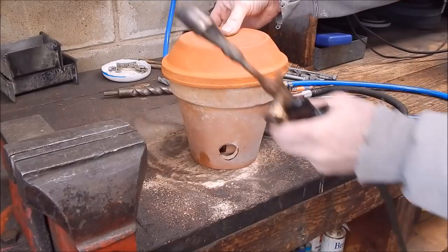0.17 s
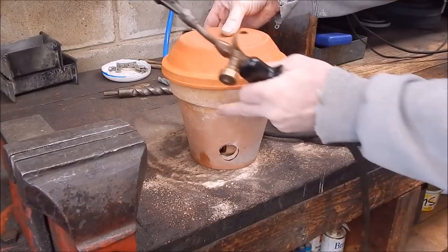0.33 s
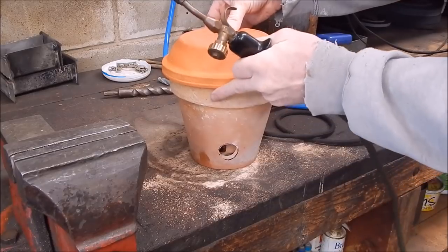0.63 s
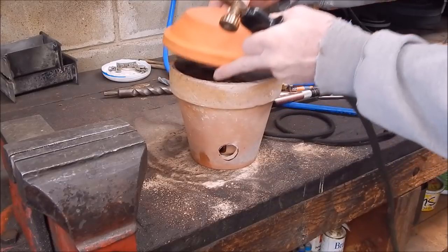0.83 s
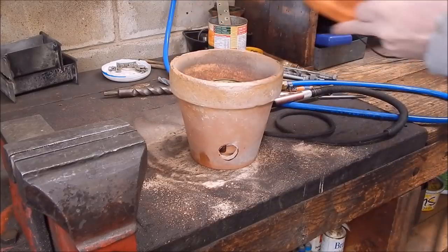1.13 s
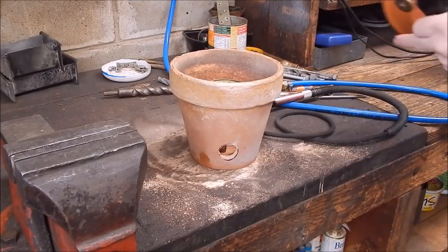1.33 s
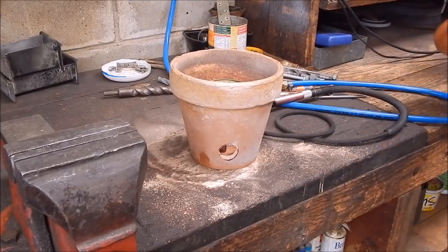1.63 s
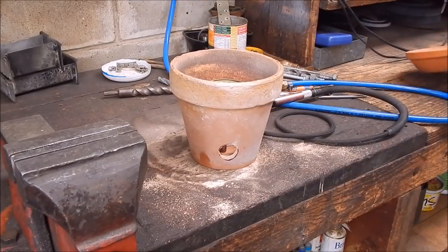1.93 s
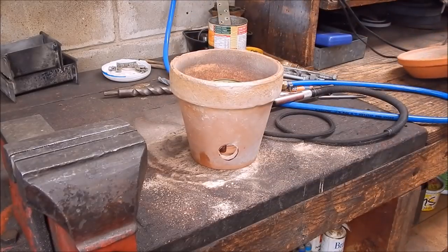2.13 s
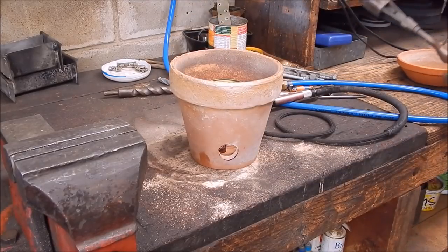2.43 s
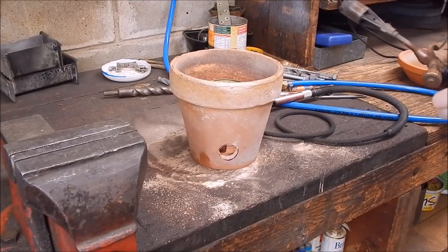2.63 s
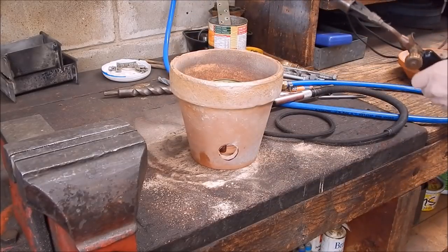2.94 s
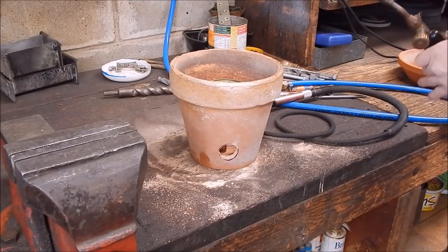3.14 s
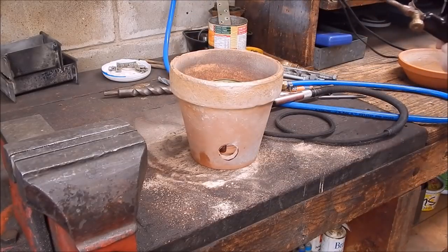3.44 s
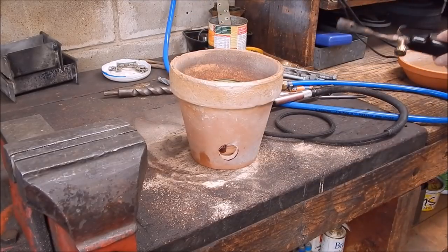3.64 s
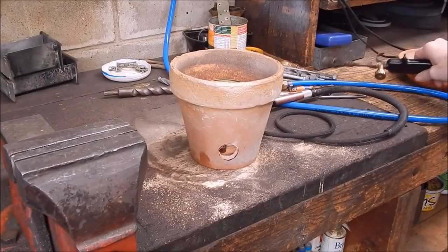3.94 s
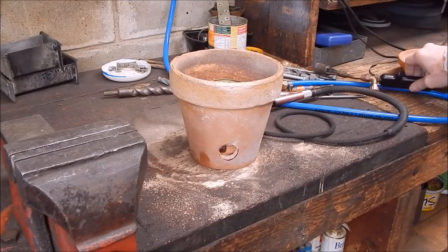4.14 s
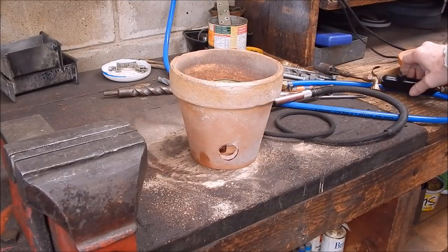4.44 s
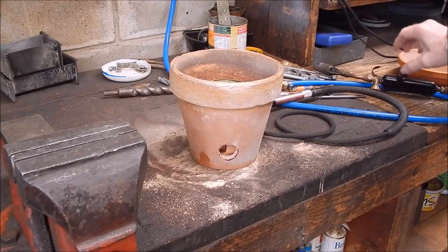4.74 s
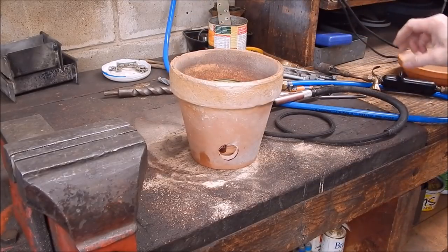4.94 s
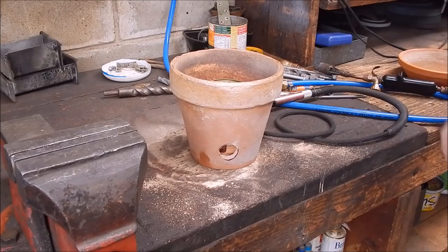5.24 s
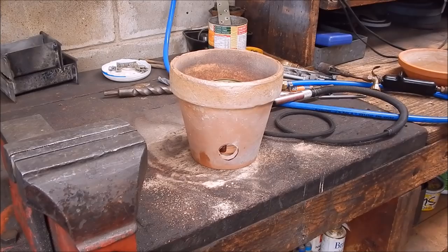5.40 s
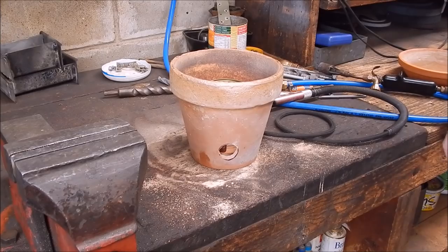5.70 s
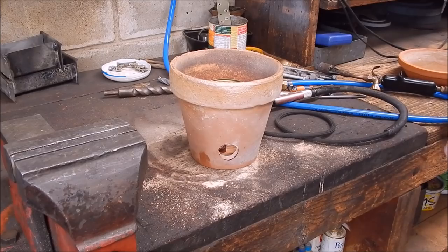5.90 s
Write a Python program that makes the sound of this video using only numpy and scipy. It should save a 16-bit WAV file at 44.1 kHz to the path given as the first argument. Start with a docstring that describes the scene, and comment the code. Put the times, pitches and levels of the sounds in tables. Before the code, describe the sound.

Over steady soft hiss, a clay lid clinks and scrapes off a flower pot, thuds onto a wooden bench, then a metal torch clacks down.

```python
"""A thin brass ring and a small bump come first, over a steady hiss that lasts throughout.
A clay saucer, the lid of a flower pot, is nudged off with a brass gas torch; the pot rocks and a sleeve swishes.
The saucer is set down on a wooden workbench, then the torch is laid down with a clack and a thud.
Struck objects are fading sine tones and short noise bursts; hiss and cloth are coloured noise.
The small workshop answers each knock with dense echoes, and a faint low drone rises in pitch."""
import sys
import numpy as np
from scipy import signal
from scipy.io import wavfile
from scipy.ndimage import uniform_filter1d

SR = 44100
rng = np.random.default_rng(int(sys.argv[2]) if len(sys.argv) > 2 else 0)


def master(y):
    """Save y as 16-bit WAV."""
    cut = np.clip(np.atleast_2d(y).T, -1, 1)
    pcm = np.round(cut * 32767)  # scale
    wavfile.write(sys.argv[1], SR, pcm.astype(np.int16))


N = 267510

# Knocks on the bench, first the saucer, then the torch:
# (time [s], thud of the top [dB], clack of the contact [dB], gritty tick [dB], slide [s])
BENCH_KNOCKS = [(2.278, -23, -35, -82, 0.00031), (2.2836, -16.5, -39.5, -74, 0.00061),
                (2.3246, -21, -38, -86, 0.0019), (2.344, -26, -56, -79, 0.0018),
                (2.549, -38, -39, -47.5, 0.0051), (2.567, -25.5, -48, -60, 0.0026),
                (2.579, -39, -48, -66, 0.0022), (2.663, -29.5, -48, -56, 0.0071),
                (2.712, -38, -57, -63, .005), (3.556, -48, -55, -64, 0.02),
                (4.0724, -43, -30.5, -31.5, 0.000081), (4.0736, -40, -21.5, -44, 0.00032),
                (4.078, -39.5, -30.5, -36, 0.00037), (4.087, -40, -34, -58, 0.00027),
                (4.1022, -34.5, -48, -58, .0005), (4.115, -32.5, -35.5, -46, 0.0011),
                (4.232, -27.5, -31.5, -43, 0.0044), (4.250, -31, -31, -45.5, 0.00077)]
# The lid touches the pot:
# (time [s], thump through the base [dB], hollow ring of the pot [dB], clink of the lid [dB], gritty tick [dB])
LID_CONTACTS = [(0.4226, -46.5, -55, -31.5, -66), (.749, -54, -36.5, -43, -51.5),
                (.771, -33, -31, -46, -67), (.797, -34.5, -37.5, -48, -70), (.858, -40.5, -41, -74, -64),
                (.885, -41, -42.5, -68, -55), (.903, -36, -62, -70, -70)]
# Short bumps and ticks of wood, clay and brass with one main note: (time [s], level [dB], frequency [Hz])
SMALL_BUMPS = [(.012, -35, 390), (.467, -39, 3880), (.568, -36, 305), (.712, -27, 317), (.752, -38, 313),
               (.862, -33.5, 410), (2.553, -39, 1470), (2.561, -29, 95.7), (2.664, -26.5, 713),
               (2.671, -29, 377), (2.716, -42, 730), (3.558, -33.5, 373), (4.0718, -14, 6900),
               (4.074, -17, 725), (4.236, -16.5, 171.5), (4.251, -22.5, 112.4), (4.51, -47, 620)]
# The brass nozzle is set ringing: (time [s], level [dB], free ringing [s])
NOZZLE_PINGS = [(0., -46, .38), (4.078, -45, 0.065), (4.25, -55, 0.031), (4.324, -55, 0.038)]
# The saucer, then the torch, meets the bench and rings: (time [s], level [dB])
SAUCER_LANDINGS = [(2.2838, -33.5), (2.3245, -41)]
TORCH_LANDINGS = [(4.0735, -23), (4.1025, -29.5), (4.25, -34.5)]
# The sleeve strokes as the arm reaches and draws back: (start [s], length [s], level [dB])
SLEEVE_STROKES = [(-.03, 0.06, -52.5), (0.067, 0.35, -67), (.72, 0.17, -64.5), (1.015, 0.21, -54),
                  (1.293, 0.39, -63.5), (2.374, .22, -58.5), (3.144, 0.23, -67.5), (3.557, 0.35, -67.5)]

# Clear notes (modes) of each object: (frequency [Hz], level [dB], time to fall 60 dB [s])
BENCH_MODES = [(113, -9, .55), (160, -9, .25), (178, 1.5, .34), (195, -2, .22), (262.5, -1, .32),
               (327.5, -7, .25), (369, -8.5, .24), (440, -3, .22)]
POT_MODES = [(350.3, -4, 0.14), (420, -20, .09), (654.7, 0, 0.15), (680.5, -4, 0.16), (770, -12, 0.13),
             (835, -9.5, 0.19)]
LID_MODES = [(509, -1.5, 0.11), (587, 3, 0.081), (1009, 8, 0.046), (1130, -10, 0.1), (2980, -27, .12)]
NOZZLE_MODES = [(2330, -6, .25), (2810, -8.5, 0.35), (5340, -0.5, 0.76), (5380, -1, 0.84),
                (5565, 0.5, 0.22)]
VALVE_MODES = [(8500, -7, 0.19), (8730, 3, 0.11), (9870, -4, 0.16)]
SAUCER_MODES = [(710, -1, 0.081), (890, -6.5, 0.081), (1420, -7.5, 0.11), (1633, -1.5, 0.085),
                (2006, -2.5, 0.11)]
TORCH_MODES = [(628, -1, 0.15), (725, 0, 0.13), (1030, -3, 0.16), (1234, 1.5, 0.13), (1510, -5, 0.098),
               (1780, -6, 0.089), (2180, -6, 0.1)]

# Colours of the dense, quickly fading blows: (frequency [Hz], level per Hz [dB])
THUD_COLOUR = [(31, -22), (71, -21.5), (111, -2), (201, 4), (431, -7), (561, -9.5), (901, -31), (2001, -36),
               (5001, -82)]
CLACK_COLOUR = [(61, -19.5), (301, -12.5), (651, -1), (951, -4.5), (1301, -6.5), (1901, -11.5),
                (2501, -18.5), (3501, -24.5), (6001, -53.5), (12001, -86)]
TICK_COLOUR = [(300, -28), (2000, 10.5), (4000, -3), (6000, -1.5), (9000, 1), (12000, 1.5)]
THUMP_COLOUR = [(26, -24), (61, -3), (121, 0), (181, -12.5), (261, -18), (701, -29), (3001, -70)]
ROLL_COLOUR = [(200, -23.5), (480, -6), (660, 0.5), (800, -15.5), (1500, -18), (5000, -63)]
CLINK_COLOUR = [(100, -16), (330, -4), (550, -6), (750, -8), (1020, -2), (1350, -10.5), (2000, -18.5),
                (2600, -33), (3800, -26.5), (6000, -42)]
# Colours of the steady hiss and of the rubbing cloth: (frequency [Hz], level per Hz [dB])
HISS_COLOUR = [(12, -56.5), (20, -11.5), (32, -1), (48, 2), (170, 2), (291, -3.5), (434, -6), (483, -9),
               (583, -8), (783, -10.5), (1020, -11.5), (1110, -10), (1270, -11.5), (2750, -23.5),
               (12000, -35.5), (15600, -75), (22000, -120)]
CLOTH_COLOUR = [(1000, -23), (2400, 1.5), (3000, 5), (3700, -1), (4600, 1.5), (5600, -2.5), (7700, -5),
                (10800, 1.5), (12000, -2.5)]

# How long the room echoes: (frequency [Hz], time to fall 60 dB [s])
ROOM_DECAY = [(101, 0.55), (401, 0.52), (1201, 0.51), (4001, 0.55), (11001, 0.51)]
# Stereo width of the handling sounds, then of hiss and cloth: (frequency [Hz], side level [dB])
HANDLING_WIDTH = [(61, -29), (201, -22), (501, -16.5), (1001, -9.5), (2001, -4.5), (5001, 0.5), (9001, 0),
                  (12001, -1.5)]
BACKGROUND_WIDTH = [(60, -7.5), (150, -9.5), (350, -6), (600, -3), (1000, -1.5), (1300, -4), (2000, -.5),
                    (5000, -0.5), (12000, 0)]

HISS_DB = -54.5
TOP_EDGE_HZ = 12150
STROKE_ATTACK_S = 0.048
STROKE_RELEASE_SHARE = 0.44  # share of the stroke length: quick moves stop quickly
RUSTLE_DB, RUSTLE_FADE_DB_PER_S = -66.5, 0.7  # cloth keeps stirring, ever less as the arm withdraws
ROCK_START_S, ROCK_PERIOD_S, ROLL_RISE_S = 1.013, 0.149, 0.02
DRONE_PEAK_S, DRONE_DB, DRONE_SLOPE_DB_PER_S = 4.15, -47.5, 20
DRONE_HZ, DRONE_GLIDE_HZ_PER_S = 63, 9.6  # the pitch at the peak, and its steady rise
BLOW_T = np.arange(SR) / SR  # one second of time, in which each blow is built


def amp(db):
    """Turns decibels into a gain."""
    return 10 ** (np.asarray(db) / 20)


def read(points, hz):
    """Reads a table joined by straight lines over log frequency."""
    table_hz, value = np.transpose(points)
    return np.interp(np.log(hz + 1), np.log(table_hz + 1), value)


def add(mix, time_s, sound):
    """Lays a sound into the mix at the given time, cut off at the end of the mix."""
    start = max(0, round(time_s * SR))
    part = mix[:, start:][:, :sound.shape[1]]
    part += sound[:, :part.shape[1]]


def colour(x, points):
    """Filters a sound to the given colour, with no response before its cause."""
    size = 8192
    hz = abs(np.fft.fftfreq(size, 1 / SR))
    log_gain = np.log(amp(read(points, hz)))
    # the Hilbert transform finds the phase that keeps the filter causal
    spectrum = np.exp(np.conj(signal.hilbert(log_gain)))
    taps = np.fft.ifft(spectrum).real[:size // 2]
    return signal.fftconvolve(x, taps[None], axes=1)[:, :x.shape[1]]


def unit_blow(x):
    """Scales a blow to the energy of a hundredth of a second at full level."""
    energy = np.sum(x[0] ** 2)
    return x * np.sqrt(SR / 100 / energy)


def burst(spectrum, t60, rise_s=1e-5):
    """Many close modes that die together, as mid and side; a sliding contact starts them gradually."""
    fade = amp(-60 * BLOW_T / t60)
    rise = 1 - np.exp(-BLOW_T / rise_s)
    grains = rng.standard_normal((2, SR)) * (fade * rise)
    return unit_blow(colour(grains, spectrum))


def ring(modes, side=0.26):
    """A few clear modes fade after one blow, as mid and side, with a peak near one."""
    hz, db, t60 = np.transpose(modes)[:, :, None]
    partials = amp(db - 60 * BLOW_T / t60) * np.sin(2 * np.pi * hz * BLOW_T)
    sign = (-1.) ** np.arange(len(modes))  # neighbouring modes swing in opposite directions
    lean = side * rng.choice([-1, 1], len(modes))
    return np.array([sign @ partials, lean @ partials]) / np.linalg.norm(amp(db))


def noise(spectrum):
    """Steady coloured noise as mid and side, with a mid rms of one."""
    x = colour(rng.standard_normal((2, N + SR)), spectrum)
    x = x[:, SR:]  # drop the start-up of the filter
    return x / x[0].std()


def stereo(x, width, lean=0.075):
    """Turns mid and side into left and right: the width varies with pitch and the sound leans right."""
    leaning_side = x[1:] - lean * x[:1]
    side = colour(leaning_side, width)[0]
    return np.array([x[0] + side, x[0] - side])


def workshop(x, wet_db, build_s=0.01):
    """Adds the room: dense echoes that build up, each band dying at its own speed."""
    hz, t, bands = signal.stft(rng.standard_normal((2, SR)), SR, nperseg=256)
    decay = amp(-60 * t / read(ROOM_DECAY, hz)[:, None])
    tail = signal.istft(bands * decay, SR, nperseg=256)[1][:, :SR]
    tail = tail * (1 - np.exp(-(BLOW_T / build_s) ** 2))
    tail = tail / np.linalg.norm(tail[0])
    echoes = signal.fftconvolve(x[:1], tail, axes=1)[:, :N]
    return x + amp(wet_db) * echoes


def drone():
    """One faint low tone swells and fades once while its pitch rises steadily."""
    t = np.arange(N) / SR - DRONE_PEAK_S
    hz = DRONE_HZ + DRONE_GLIDE_HZ_PER_S * t
    phase = 2 * np.pi * np.cumsum(hz) / SR
    level = amp(DRONE_DB - DRONE_SLOPE_DB_PER_S * abs(t))
    return np.sqrt(2) * level * np.sin(phase)  # root two makes the level an rms


def hiss():
    """Steady noise shaped to the colour of the hiss."""
    return amp(HISS_DB) * noise(HISS_COLOUR)


def sleeve(flutter_db=1.53):
    """Cloth rubs on cloth: each stroke swells, holds and dies away over a faint rustle."""
    t = np.arange(N) / SR
    power = amp(RUSTLE_DB - RUSTLE_FADE_DB_PER_S * t) ** 2
    for start, length, db in SLEEVE_STROKES:
        attack = np.clip((t - start) / STROKE_ATTACK_S, 0, 1)
        since_end = np.maximum(t - start - length, 0)
        release = np.exp(-since_end / (STROKE_RELEASE_SHARE * length))
        power = power + (amp(db) * attack * release) ** 2
    grain = uniform_filter1d(rng.standard_normal(N), size=220)  # cloth catches and slips every few ms
    flutter = amp(flutter_db * grain / grain.std())
    return noise(CLOTH_COLOUR) * np.sqrt(power) * flutter


def background():
    """Joins the rubbing sleeve and the hiss in stereo, with the drone in the centre."""
    return stereo(sleeve() + hiss(), BACKGROUND_WIDTH) + drone()


def bumps(cycles=17.4):
    """Small, well damped knocks that die within a few cycles of their note."""
    out = np.zeros((2, N))
    for time_s, db, hz in SMALL_BUMPS:
        t60 = cycles / hz
        note = ring([(hz, 0, t60), (hz * 1.08, -8, 0.76 * t60)])
        rise = 1 - np.exp(-BLOW_T * hz / 0.53)  # about half a cycle
        add(out, time_s, amp(db) * note * rise)
    return workshop(out, wet_db=-3.5)


def rocking(first_db=-46, fade_db=1.4, count=7):
    """The freed pot rolls from side to side on its base, ever more weakly."""
    out = np.zeros((2, N))
    rise = 1 - np.exp(-(BLOW_T / ROLL_RISE_S) ** 2)
    for k in range(count):
        roll = unit_blow(burst(ROLL_COLOUR, t60=0.11) * rise)
        add(out, ROCK_START_S + ROCK_PERIOD_S * k, amp(first_db - fade_db * k) * roll)
    return workshop(out, wet_db=-7)


def pot():
    """The lid clinks and drags over the rim of the hollow pot, sounding the modes of both."""
    out = np.zeros((2, N))
    for time_s, thump_db, ring_db, clink_db, tick_db in LID_CONTACTS:
        clink = 1.35 * ring(LID_MODES) + 0.52 * burst(CLINK_COLOUR, t60=0.078)
        add(out, time_s, amp(thump_db) * burst(THUMP_COLOUR, t60=0.12))
        add(out, time_s, amp(ring_db) * ring(POT_MODES))
        add(out, time_s, amp(clink_db) * clink)
        add(out, time_s, amp(tick_db) * burst(TICK_COLOUR, t60=0.13, rise_s=0.0028))
    return workshop(out, wet_db=-4.0)


def nozzle(choke_s=0.014):
    """The brass tip of the torch rings thin and long until a touch chokes it; the valve tinkles as it lands."""
    out = np.zeros((2, N))
    for time_s, db, free_s in NOZZLE_PINGS:
        choke = np.exp(-np.maximum(BLOW_T - free_s, 0) / choke_s)
        add(out, time_s, amp(db) * ring(NOZZLE_MODES, side=0.77) * choke)
    add(out, 4.115, amp(-37) * ring(VALVE_MODES, side=0.8))
    sway = uniform_filter1d(rng.standard_normal(N), size=400)  # the ring flutters as the torch turns
    flutter = 1 + 0.18 * sway / sway.std()
    return workshop(out * flutter, wet_db=-11)


def struck(taps, modes):
    """An object rings briefly with its own modes each time it meets the bench."""
    out = np.zeros((2, N))
    for time_s, db in taps:
        add(out, time_s, amp(db) * ring(modes, side=0.6))
    return workshop(out, wet_db=-7.5)


def bench(dense=1.0, smear=16.0):
    """Each knock booms in the bench top, clacks at the contact and crushes a little grit."""
    low, high = np.zeros((2, 2, N))
    for time_s, thud_db, clack_db, tick_db, slide_s in BENCH_KNOCKS:
        drag = smear * slide_s  # a slide draws the contact out
        thud = ring(BENCH_MODES) + dense * burst(THUD_COLOUR, t60=0.062)
        clack = burst(CLACK_COLOUR, t60=0.028 + drag, rise_s=slide_s)
        tick = burst(TICK_COLOUR, t60=0.022 + drag, rise_s=slide_s)
        add(low, time_s, amp(thud_db) * thud)
        add(high, time_s, amp(clack_db) * clack)
        add(high, time_s, amp(tick_db) * tick)
    return workshop(low, wet_db=-7) + workshop(high, wet_db=-4.0)


def scene():
    """Lays all the handling sounds over the background."""
    lid_off = pot() + rocking()
    ringing = struck(SAUCER_LANDINGS, SAUCER_MODES) + struck(TORCH_LANDINGS, TORCH_MODES)
    set_down = bench() + ringing + nozzle()
    return stereo(lid_off + set_down + bumps(), HANDLING_WIDTH) + background()


def record(dry):
    """A steep low-pass filter removes the treble above the top edge."""
    taps = signal.firwin(511, TOP_EDGE_HZ, window=("kaiser", 9), fs=SR)
    return signal.oaconvolve(dry, taps[None], "same")


dry = scene()
out = record(dry)
master(out)
```